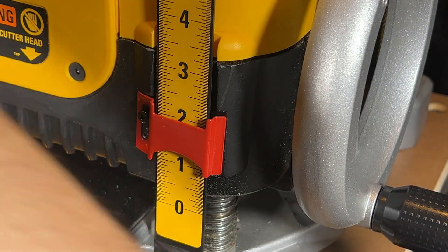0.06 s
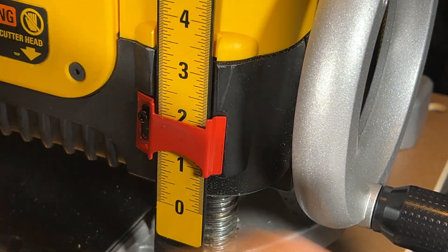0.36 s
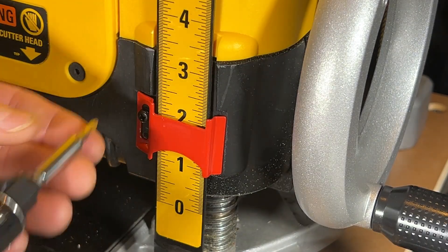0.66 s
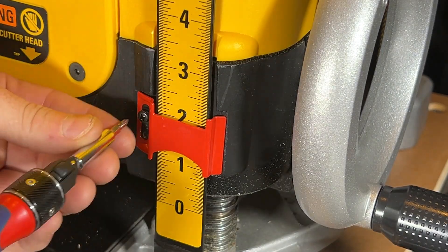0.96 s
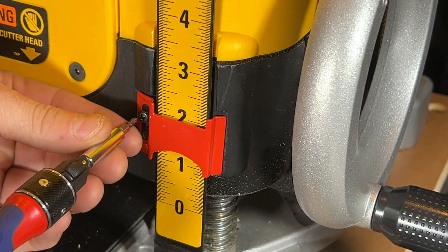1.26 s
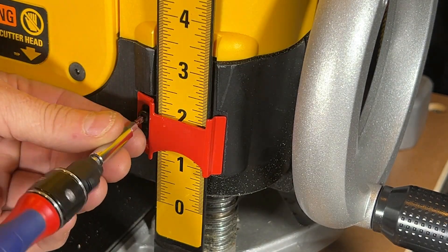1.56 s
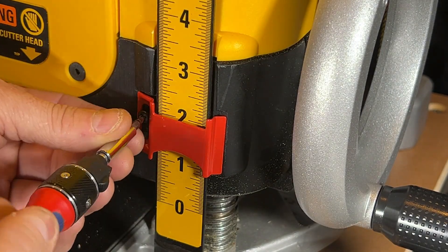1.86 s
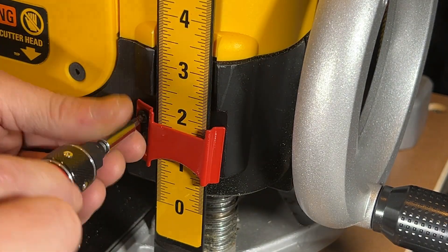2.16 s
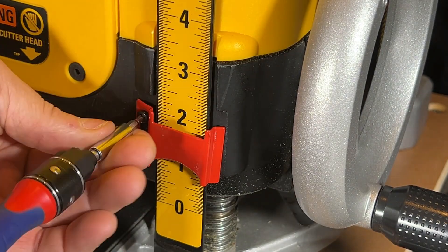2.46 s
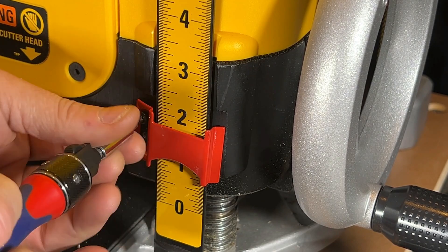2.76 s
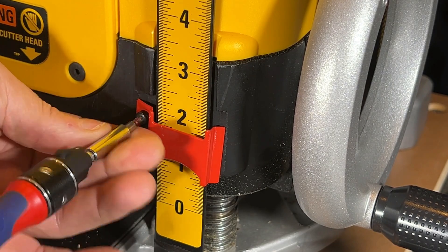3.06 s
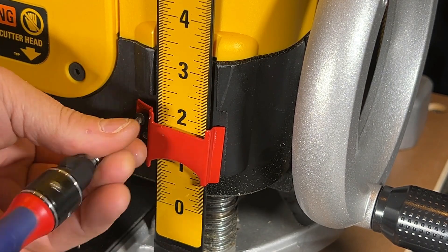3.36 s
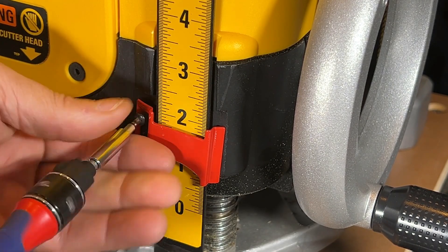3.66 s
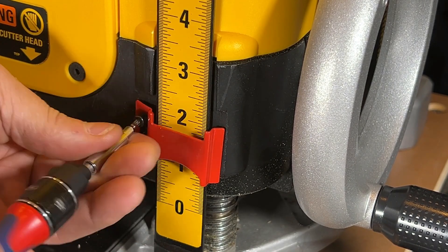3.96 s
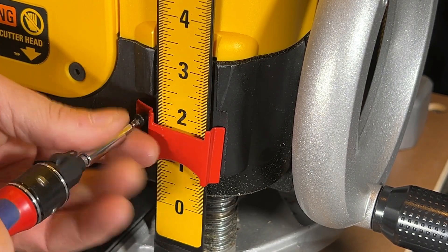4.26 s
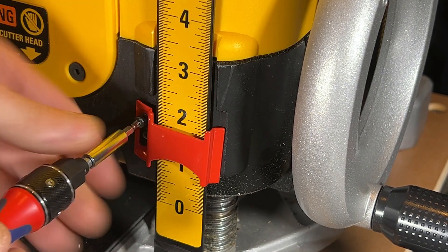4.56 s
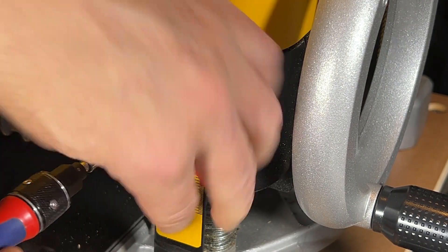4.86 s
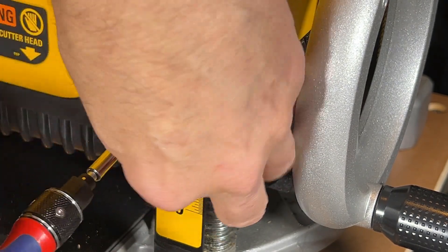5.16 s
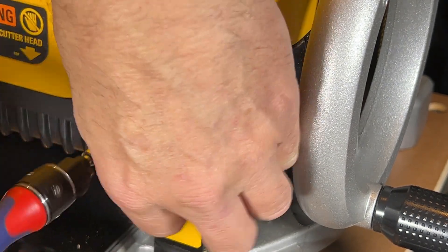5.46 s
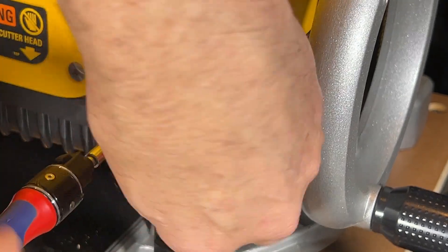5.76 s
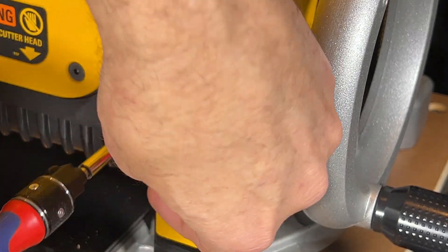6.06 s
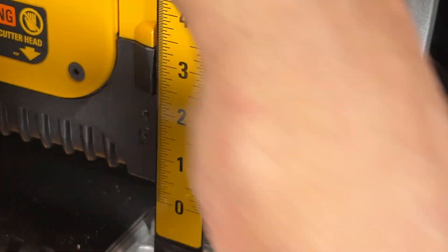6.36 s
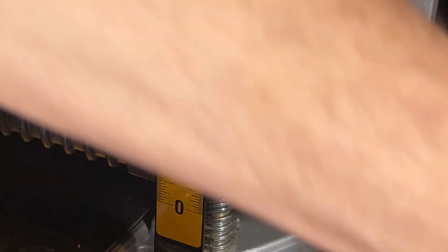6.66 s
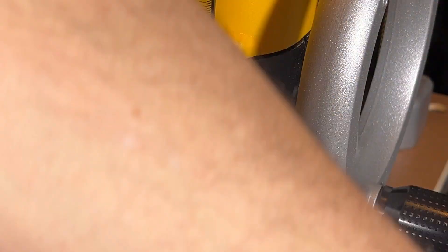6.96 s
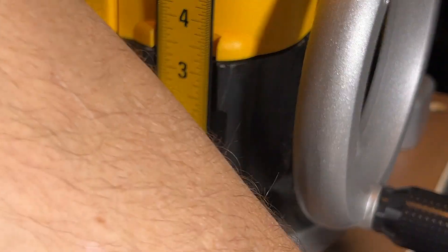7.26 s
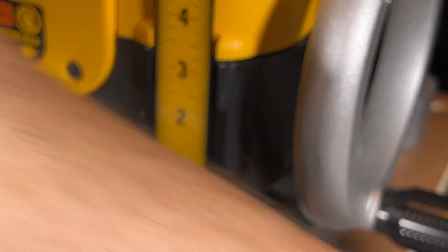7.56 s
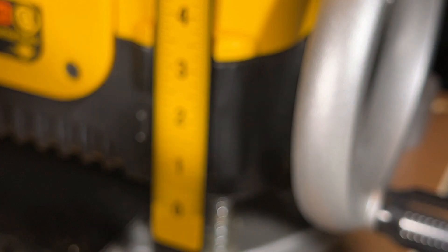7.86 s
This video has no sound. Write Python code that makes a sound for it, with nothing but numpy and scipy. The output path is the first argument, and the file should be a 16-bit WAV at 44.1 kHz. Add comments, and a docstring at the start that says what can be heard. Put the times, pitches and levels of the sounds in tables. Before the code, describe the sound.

Close metallic clicking of a small screw being undone, a sharp snap, then loud thumps with thin ringing over low ventilation rumble.

```python
"""Unscrewing a pointer bracket

A quiet workshop, a phone on a stand close to a bench machine. A hand screwdriver backs a small screw
out of the pointer bracket, ticking and scraping in bursts, one per turn of the wrist. The loose bracket
clacks and snaps free. An arm bumps the phone's stand, softly early on and hard at the end, and the
harder clacks and bumps set tiny springs ringing. Ventilation rumbles underneath."""
import sys
import numpy as np
from scipy import signal
from scipy.fft import rfft, irfft
from scipy.io import wavfile
from scipy.ndimage import uniform_filter1d

SR = 44100
rng = np.random.default_rng(int(sys.argv[2]) if len(sys.argv) > 2 else 0)


def inscribe(sig):
    """Save sig as 16-bit PCM at rate SR to the path in sys.argv[1].

    A 1-D sig is mono; a 2-D sig holds one channel per row.
    Samples are clipped to [-1, 1] before scaling.
    """
    pcm = np.round(np.clip(np.atleast_2d(sig).T, -1, 1) * 32767)
    wavfile.write(sys.argv[1], SR, pcm.astype(np.int16))


N = 353682

# room tone, rumble and hiss: f/Hz, level/dB
ROOM_TONE = [(15, -57.5), (25, -26.5), (40, -4.5), (78, -0.5), (111, -7), (180, -6.5), (300, -12.5),
             (460, -16), (750, -24), (1300, -31), (2500, -45), (10000, -55), (13000, -47.5), (16000, -51.5)]
# bumps on the stand: t/s, thump/dB, upper edge of the push/Hz, hard contact/dB, snap/dB, sway/dB
BUMPS = [(.155, -41.5, 880, -68.5, -89, -56), (1.653, -46, 220, -85, -90, -55),
         (7.186, -23, 620, -51, -58, -49.5), (7.397, -32, 300, -76.5, -80, -51.5),
         (7.498, -23.5, 800, -24.5, -51.5, -45.5), (7.507, -20.5, 495, -34, -61, -45),
         (7.56, -31, 800, -67, -56, -41), (7.915, -27, 329, -45.5, -42, -44.5)]
# modes of the stand and of its clamp: f/Hz, level/dB, t60/s
STAND_MODES = [(140, -17, 0.33), (181.6, -2, 0.12), (267, -8, 0.1), (299, -0.5, 0.051), (440, -5, 0.038),
               (520.4, -3, 0.053), (654, -13, 0.04)]
CLAMP_MODES = [(936, 1.5, 0.025), (1156, -9, 0.051), (1330, -6, 0.065), (1710, -10, 0.065),
               (1784, -9, 0.075), (1910, -31.5, 0.45), (2175, -15.5, 0.031), (2283, -9.5, 0.037),
               (2670, -10, 0.03)]
# spectra of the stand's loose parts, a hard contact's rattle and a bright snap: f/Hz, level/dB
SHUDDER = [(90, -23), (160, 6), (300, 2), (520, -5.5), (700, -14), (1500, -38.5)]
RATTLE = [(300, -35), (620, 2), (780, -2.5), (970, 4), (1150, 1), (1350, -5.5), (1500, -6.5), (1700, -8.5),
          (2400, -6), (3300, -9), (4000, -17.5), (5000, -31.5)]
SNAP = [(2500, -14.5), (4500, -7.5), (6000, -7), (7500, -1), (8700, 3), (10000, -13.5), (12000, -2.5),
        (15000, -26)]
# hand strokes, firm on the screw, light on loose parts: start/s, end/s, pressure as steel level/dB
STROKES = [(0.609, 0.712, -68.5), (.72, 0.816, -76), (0.939, 0.966, -78.5), (1.358, 1.452, -76.5),
           (1.552, 1.612, -78), (1.623, 1.722, -60.5), (1.72, 1.764, -69), (1.795, 1.912, -65),
           (1.936, 2.009, -70), (2.095, 2.27, -61), (2.289, 2.442, -58.5), (2.481, 2.652, -62),
           (2.648, 2.71, -73.5), (2.697, 2.767, -62), (2.851, 3.03, -63), (2.974, 3.09, -57),
           (3.098, 3.203, -61), (3.198, 3.315, -57), (3.321, 3.38, -69.5), (3.38, 3.48, -61),
           (3.481, 3.585, -53.5), (3.608, 3.84, -61.5), (3.832, 3.925, -70), (3.912, 4.108, -56.5),
           (4.11, 4.19, -62), (4.23, 4.356, -57), (4.36, 4.502, -70.5), (4.54, 4.62, -62.5),
           (4.862, 4.929, -74.5), (5.042, 5.165, -80), (5.452, 5.506, -69.5), (5.569, 5.612, -67),
           (5.671, 5.719, -75), (5.788, 5.917, -76), (5.961, 6.067, -77.5), (6.271, 6.318, -84),
           (6.372, 6.433, -75.5), (6.753, 6.918, -68), (6.957, 7.081, -75.5)]
# spectra of sliding steel and skin: f/Hz, level/dB
STEEL_RUB = [(1500, -23.5), (3200, -9), (4700, 2.5), (6300, -6), (8300, 2.5), (10000, -17), (12000, -6.5),
             (15000, -15.5)]
SKIN_RUB = [(250, -13.5), (550, 6), (1100, -4.5), (1750, 1), (2300, -1), (3000, -0.5), (4000, -11.5),
            (7000, -26)]
# modes of steel tip, screw and shank in three registers: f/Hz, level/dB, t60/s
TIP_LOW = [(1140, -9.5, 0.0021), (1800, 0, 0.0032), (2260, -9.5, 0.0026), (3090, 6, 0.0048)]
TIP_MID = [(4846, -1, 0.0049), (5240, 0, 0.003), (6290, -7, 0.0085), (7300, -2, 0.0035), (8100, -3, 0.012),
           (8550, 7, 0.0062)]
TIP_TOP = [(11100, 2.5, 0.0022), (12700, -4.5, .0018), (14000, -5.5, 0.0023)]
# friction squeals: t/s, length/s, start f/Hz, end f/Hz, level/dB, roughness/0-1
SQUEALS = [(0.636, 0.034, 4600, 4080, -49.5, 0.12), (1.712, 0.046, 2600, 2380, -64, 0.72),
           (1.877, .04, 1614, 1720, -59.5, 0.7), (2.97, 0.028, 2850, 3030, -53, 0.59),
           (3.546, 0.047, 3050, 2906, -52, 0.8), (3.705, 0.042, 4697, 4690, -46.5, .12),
           (4.128, .035, 2800, 2920, -56, .7), (6.756, 0.172, 2600, 2705, -60.5, 0.99)]
# loudest slips of bit and screw, and of the tool being put away: t/s, level/dB, relative low modes/dB
LOUD_SLIPS = [(0.6428, -39, -14.5), (.6586, -45, -18), (0.6714, -39.5, -16), (1.366, -55.5, -6),
              (1.635, -47.5, -4), (1.7974, -45, -10), (1.819, -40.5, -10), (1.882, -49, 0),
              (2.1624, -47.5, -3), (2.2117, -42.5, -12), (2.23, -44.5, -7), (2.289, -36, -12.5),
              (2.3302, -36, -1), (2.351, -41, -13.5), (2.4008, -30, -14), (2.487, -40, -9),
              (2.5074, -42.5, -2), (2.5751, -41.5, -6), (2.5913, -35.5, -12), (2.613, -30.5, -17),
              (2.71, -46.5, 0), (3.026, -34, -12), (3.0765, -38.5, -6.5), (3.1259, -35.5, -14),
              (3.151, -44.5, -10), (3.2217, -37.5, -13.5), (3.2608, -42, -8), (3.4183, -38.5, -6.5),
              (3.436, -38, -9.5), (3.5159, -30, -15), (3.616, -40.5, -3), (3.635, -43, -4),
              (3.6544, -40, -20), (3.725, -34.5, -14), (3.7877, -46, -1), (3.9665, -40.5, -13),
              (3.988, -43.5, -0.5), (4.069, -36.5, -12), (4.093, -43.5, -12), (4.239, -41, -5),
              (4.2624, -38, -9.5), (4.3032, -42, -4), (4.3309, -36.5, -10), (5.8887, -48.5, -2.5),
              (6.3915, -55, -3), (6.834, -39, -4.5), (6.8745, -43, -10), (6.88, -36, -13),
              (6.8879, -44, -10), (6.8985, -37, -12), (6.907, -42.5, -15), (6.97, -42.5, -25)]
# the loose bracket hits the housing: t/s, body level/dB, relative bright rattle/dB
CLACKS = [(1.626, -62.5, 5), (1.654, -53.5, -19), (2.036, -45.5, -17), (4.19, -45.5, 1.5),
          (4.278, -50.5, -13.5), (4.415, -55.5, -12), (4.543, -53.5, 2), (5.256, -61, -15),
          (5.485, -55, -4.5), (5.574, -55.5, -4), (5.811, -58.5, -8)]
# modes of bracket and housing: f/Hz, level/dB, t60/s
BRACKET_MODES = [(362, -1, 0.087), (426, -3.5, 0.055), (571, 0.5, 0.14), (660.5, -5, 0.063),
                 (796, -2, 0.075), (995, -2.5, 0.085), (1126, 0, 0.043)]
# spectrum of the housing's thud: f/Hz, level/dB
THUD = [(100, -20), (160, -6), (350, -1.5), (600, 0), (850, 0), (1300, -13), (2500, -26)]
# jolts of the springs: t/s, level/dB, tilt towards the top modes/dB
JOLTS = [(2.036, -49, -14), (4.185, -47, -3), (4.193, -37.5, -3), (4.198, -38.5, 0), (6.971, -64, 2),
         (6.996, -47.5, 12), (7.191, -53, 7), (7.283, -56, 5), (7.462, -65.5, 10), (7.502, -47, 7),
         (7.518, -42, 4.5), (7.544, -44.5, 8), (7.561, -45.5, -4), (7.59, -50.5, -5), (7.615, -53, -10),
         (7.66, -46.5, 4.5), (7.701, -44, 4)]
# modes of the springs in four registers: f/Hz, level/dB, t60/s
SPRING_LOW = [(4890, -9, 0.11), (4970, -7, 0.043)]
SPRING_MID = [(8620, 0, 0.081)]
SPRING_HIGH = [(7994, -7, .07), (9372, 3, .075), (11180, -15, .06)]
SPRING_TOP = [(14830, 1.5, .07), (15060, -3.5, .05)]
# modes of the freed bracket in the hand: f/Hz, level/dB, t60/s
RELEASE_MODES = [(601, -21, 0.022), (1120, -24.5, .025), (1554, -20.5, 0.028), (2070, -13.5, .025),
                 (2660, -17.5, 0.017), (5250, -10.5, 0.015), (6270, -44.5, 0.64), (7180, 5, 0.0076),
                 (12140, -8, 0.014), (14120, -11, .006)]
# spectrum of the crack as it lets go: f/Hz, level/dB
CRACK = [(500, -16.5), (2000, -7.5), (3300, -8.5), (5000, -5), (8500, 6), (10000, -3.5), (12000, 2),
         (15000, -11)]
# diffuse sound at the phone's two microphone ports: f/Hz, side minus mid/dB
SPREAD = [(60, -24), (300, -10.5), (450, -6.5), (680, -3), (1300, -7), (2400, -39), (8000, -18.5),
          (15000, -23)]
# lead of the left port over the right: f/Hz, phase/rad
PORT_PHASE = [(30, 0.5), (2000, 0), (3300, 0.72), (4900, 0.6), (5800, 0.5), (6900, 0.5), (8300, -1),
              (8800, -1.6), (9400, -3), (10800, -2.5), (12600, -9.5), (14000, -1.5), (15100, -8.5)]

FIRM_DB = -58.5  # pressure of a firm turn, on the scale of STROKES


def undb(db):
    """Decibels to gain."""
    return 10 ** (np.asarray(db) / 20)


def seconds(length):
    """A time axis."""
    return np.arange(int(length * SR)) / SR


def on_bins(points, size):
    """A table over frequency, interpolated onto the bins of a transform."""
    hz, value = np.transpose(points)
    bin_hz = np.maximum(np.arange(size // 2 + 1), .5) * SR / size
    return np.interp(np.log(bin_hz), np.log(hz), value)


def colour(x, spectrum, size=2048):
    """Minimum-phase filter with the given spectrum (f/Hz, level/dB)."""
    cepstrum = irfft(np.log(undb(on_bins(spectrum, size))))
    cepstrum[1:size // 2] *= 2
    cepstrum[size // 2 + 1:] = 0
    return signal.fftconvolve(x, irfft(np.exp(rfft(cepstrum))))[:len(x)]


def level(x, db, span):
    """Scale so that the first span seconds have the given rms level."""
    return x * undb(db) / np.sqrt(np.mean(x[:int(span * SR)] ** 2))


def add(track, s, sound):
    """Mix a sound in at time s."""
    start = int(s * SR)
    track[start:start + len(sound)] += sound[:N - start]


def burst(t, rise, t60):
    """Noise that swells quickly and dies away."""
    return rng.standard_normal(len(t)) * (1 - np.exp(-t / rise)) * undb(-60 * t / t60)


def ring(t, modes, rise, detune, scatter_db, in_step=False):
    """Damped modes, weighted anew as each blow lands elsewhere; a broad push starts them in step."""
    hz, db, t60 = np.transpose(modes)[:, :, None]
    pitch, weight, phase = rng.standard_normal((3, len(modes), 1))
    cycles = hz * (1 + detune * pitch) * t + (0 if in_step else phase)
    waves = np.sin(2 * np.pi * cycles) * np.exp(-np.log(1000) * t / t60)
    return (undb(db + scatter_db * weight) * waves).sum(0) * (1 - np.exp(-t / rise))


def mid_side(mid, diffuse):
    """Left and right from a mid signal and a diffuse sound for the side."""
    side = colour(diffuse, SPREAD)
    return np.array([mid + side, mid - side])


def room_tone(db=-58):
    """Steady low ventilation rumble with a faint hiss, all round the microphone."""
    mid, diffuse = (colour(rng.standard_normal(N), ROOM_TONE, size=8192) for _ in range(2))
    return mid_side(level(mid, db, N / SR), level(diffuse, db, N / SR))


def stand_bumps(feet_hz=127, sway_s=.12, lean_s=.0067):
    """Handling noise: a hollow thump, darker if soft; a shudder; a crack if hard; a low sway."""
    out, t = np.zeros(N), seconds(.4)
    sway_spectrum = [(20, -14), (50, 6), (80, -10), (125, .5), (200, -12), (500, -39), (2000, -81)]
    for s, thump_db, push_hz, hard_db, snap_db, sway_db in BUMPS:
        body = ring(t, STAND_MODES, rise=.0054, detune=.011, scatter_db=4, in_step=True)
        body *= np.exp(-t / .0099) + .12  # the feet soak up most of the first swing
        thump = signal.sosfilt(signal.butter(3, push_hz, fs=SR, output="sos"), body)
        thump = signal.sosfilt(signal.butter(3, feet_hz, "high", fs=SR, output="sos"), thump)
        add(out, s, level(thump, thump_db, span=.015))
        shudder = colour(burst(t, rise=.015, t60=.31), SHUDDER)
        add(out, s, level(shudder, thump_db - 17.5, span=.028))
        rattle = burst(t, rise=.0005, t60=.054) + undb(-19) * burst(t, rise=.005, t60=.35)
        clamp = ring(t, CLAMP_MODES, rise=.0012, detune=.0067, scatter_db=-1)
        crack = level(clamp, 0, span=.005) + level(colour(rattle, RATTLE), -.15, span=.014)
        snap = colour(burst(t, rise=.00091, t60=.059), SNAP)
        add(out, s, level(crack, hard_db, span=.023) + level(snap, snap_db, span=.0041))
        sway = colour(rng.standard_normal(len(t)), sway_spectrum)[-int(sway_s * SR):]
        sway *= np.hanning(len(sway))
        add(out, s - lean_s, level(sway, sway_db, sway_s))  # the arm leans in just before the bump
    return out


def rubbing(grain_hz=260, grain_db=4, grain_s=.0011, slide=.24):
    """Each stroke: dense tiny slips of the bit over the smoother, duller brushing of skin."""
    out = np.zeros(N)
    for start, end, db in STROKES:
        length = end - start + .02
        count = int(length * SR)
        press = signal.windows.tukey(count, .45)
        onsets = rng.random(count) < grain_hz / SR
        grains = onsets * undb(grain_db * np.minimum(rng.exponential(size=count), 3))
        contact = signal.lfilter([1], [1, -np.exp(-1 / (grain_s * SR))], grains)
        steel = colour(press * (contact + slide) * rng.standard_normal(count), STEEL_RUB)
        skin = colour(press * (contact + 2 * slide) * rng.standard_normal(count), SKIN_RUB)
        skin_db = -60 + .75 * (db - FIRM_DB)  # skin grows less with pressure than steel
        add(out, start - .01, level(steel, db, length) + level(skin, skin_db, length))
    return out


def slip(db, body_db):
    """One slip of steel on steel: a millisecond of grit rings the tip's modes."""
    t = seconds(.015)
    grit = burst(t, rise=.0006, t60=.0034) + undb(-25) * burst(t, rise=.0003, t60=.02)
    top_db = -6 + 2.5 * rng.standard_normal()  # brightness varies from slip to slip
    out = 0
    for modes, relative_db in (TIP_LOW, body_db), (TIP_MID, 0), (TIP_TOP, top_db):
        tip = ring(t, modes, rise=.0001, detune=.05, scatter_db=5)
        tick = signal.fftconvolve(grit, tip)[:len(t)]
        out += level(tick, db + relative_db, span=.004)
    return out


def screw_thread(gap_s=.017, jitter=.22, hold_s=.011, firm_slip_db=-49.5, scatter_db=3):
    """Through each stroke the steel catches and slips at a nearly even pace, louder under pressure."""
    out, loud_times = np.zeros(N), np.array(LOUD_SLIPS)[:, 0]
    for start, end, db in STROKES:
        times = np.arange(start + gap_s / 2, end - gap_s / 2, gap_s)
        slip_db = firm_slip_db + 1.4 * (db - FIRM_DB)
        for s, (late, size) in zip(times, rng.standard_normal((len(times), 2))):
            s += jitter * gap_s * late
            tick = slip(slip_db + scatter_db * min(size, 1), body_db=-2.5)
            if np.abs(loud_times - s).min() > hold_s:  # the thread holds still around a loud slip
                add(out, s, tick)
    return out


def squeals():
    """Brief, rough gliding tones where the tool sticks and slides."""
    out = np.zeros(N)
    for s, length, start_hz, end_hz, db, roughness in SQUEALS:
        count = int(length * SR)
        flutter = uniform_filter1d(rng.standard_normal(count), size=40)
        hz = np.linspace(start_hz, end_hz, count) * (1 + roughness * flutter)
        tone = np.sin(2 * np.pi * np.cumsum(hz) / SR)
        add(out, s, level(tone * np.hanning(count), db, length))
    return out


def bit_ticks():
    """The loudest slips of the steel stand out as clear, close ticks."""
    out = np.zeros(N)
    for s, db, body_db in LOUD_SLIPS:
        add(out, s, slip(db, body_db))
    return out


def bracket_clacks():
    """The bracket's edge hits the housing: hollow modes and a dull thud under a short rattle."""
    out, t = np.zeros(N), seconds(.25)
    edge_spectrum = [(500, -7.5), (1200, -11.5), (2100, -4), (3200, -6), (4200, -9.5), (7000, -12.5)]
    for s, db, bright_db in CLACKS:
        body = ring(t, BRACKET_MODES, rise=.005, detune=.07, scatter_db=2.5)
        thud = colour(burst(t, rise=.0032, t60=.097), THUD)
        edge = colour(burst(t, rise=.0013, t60=.077), edge_spectrum)
        rattle = colour(burst(t, rise=.0042, t60=.05), SNAP)
        add(out, s, level(body, db, span=.026) + level(thud, db - 4, span=.019))
        add(out, s, level(edge, db + 5, span=.014) + level(rattle, db + bright_db, span=.056))
    return out


def springs(stop_db=-5, hard_jolt_db=-44.5):
    """At each jolt tiny springs tick against their stops, chatter and ring thinly."""
    out, t = np.zeros(N), seconds(.3)
    for s, db, tilt_db in JOLTS:
        registers = [  # modes, relative level/dB, rise/s
            (SPRING_LOW, -5.5 - tilt_db, .006),
            (SPRING_MID, -1 + .23 * tilt_db, .001),
            (SPRING_HIGH, 3 + .45 * (db - hard_jolt_db), .002),  # favoured by hard jolts
            (SPRING_TOP, -8.5 + tilt_db, .001)]
        for modes, relative_db, rise in registers:
            tone = ring(t, modes, rise, detune=.00073, scatter_db=0)
            chatter = signal.fftconvolve(burst(t, rise=.00079, t60=.064), tone)[:len(t)]
            ringing = level(tone, 0, span=.0097) + level(chatter, -7, span=.04)
            add(out, s, level(ringing, db + relative_db, span=.012))
        tick = colour(burst(t, rise=.0007, t60=.016), SNAP)
        add(out, s, level(tick, db + stop_db, span=.011))
    return out


def bracket_release(s=5.188, ring_db=-29.5, crack_db=-30):
    """The bracket snaps free: one sharp, dry click and a faint after-ring."""
    out, t = np.zeros(N), seconds(.35)
    ringing = ring(t, RELEASE_MODES, rise=.0001, detune=.0036, scatter_db=-1.5)
    crack = colour(burst(t, rise=.0002, t60=.013), CRACK)
    add(out, s, level(ringing, ring_db, span=.0026) + level(crack, crack_db, span=.0033))
    return out


def workshop(x, near_db, tail_db, wall_s=.0037):
    """Quick reflections off the machine and the room's short tail; one side echo gives the width."""
    t = seconds(.5)
    near = burst(t, rise=.0019, t60=.052)
    tail = colour(burst(t, rise=.0019, t60=.31), [(200, 6.5), (3000, 1.5), (8000, -8.5), (15000, -4.5)])
    near, tail = (signal.fftconvolve(x, r / np.linalg.norm(r))[:N] for r in (near, tail))
    side_echo = np.roll(x, int(wall_s * SR))
    return mid_side(x + undb(near_db) * near + undb(tail_db) * tail, side_echo)


def scene(pan_db=.5):
    """Tool work close and centred; stand and springs drier and a touch right; room tone behind."""
    screwdriver = rubbing() + screw_thread() + squeals() + bit_ticks()
    work = workshop(screwdriver + bracket_clacks() + bracket_release(), near_db=-11.5, tail_db=-14.5)
    bumps = workshop(stand_bumps() + springs(), near_db=-18.5, tail_db=-23)
    pan = undb([[-pan_db / 2], [pan_db / 2]])
    return work + bumps * pan + room_tone()


def record(dry, low_cut_hz=30, high_cut_hz=15600):
    """The phone's two microphone ports part in phase, most in the treble; deep bass and top are cut."""
    phase_shift = np.exp(.5j * on_bins(PORT_PHASE, N) * np.array([[1], [-1]]))
    ports = irfft(rfft(dry) * phase_shift, N)
    ports = signal.sosfilt(signal.butter(2, low_cut_hz, "high", fs=SR, output="sos"), ports)
    return signal.sosfilt(signal.ellip(8, .2, 70, high_cut_hz, fs=SR, output="sos"), ports)


dry = scene()
out = record(dry)
inscribe(out)
```